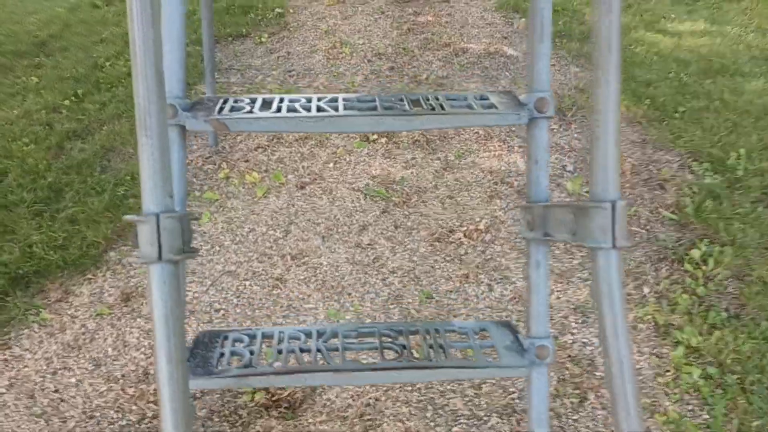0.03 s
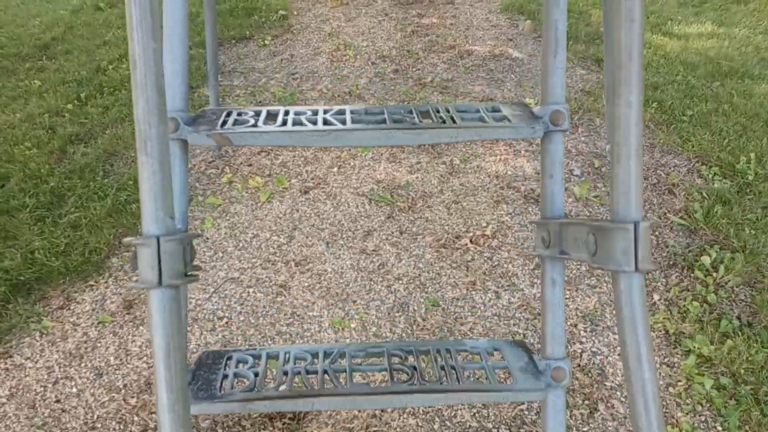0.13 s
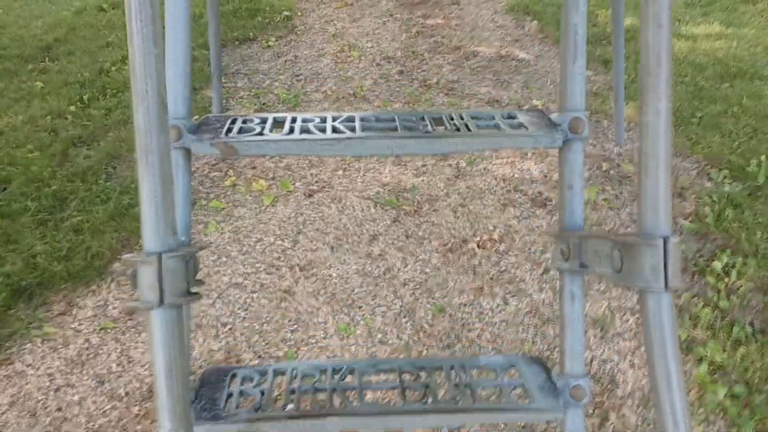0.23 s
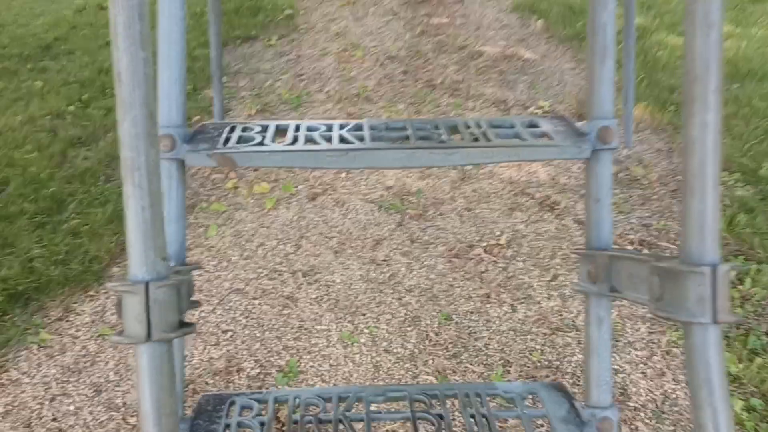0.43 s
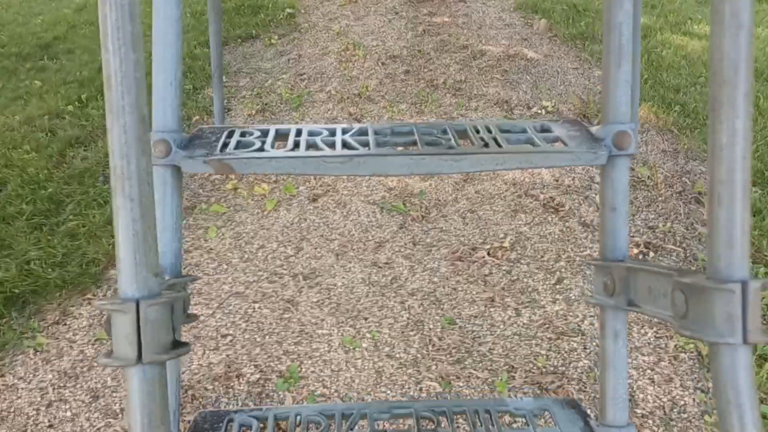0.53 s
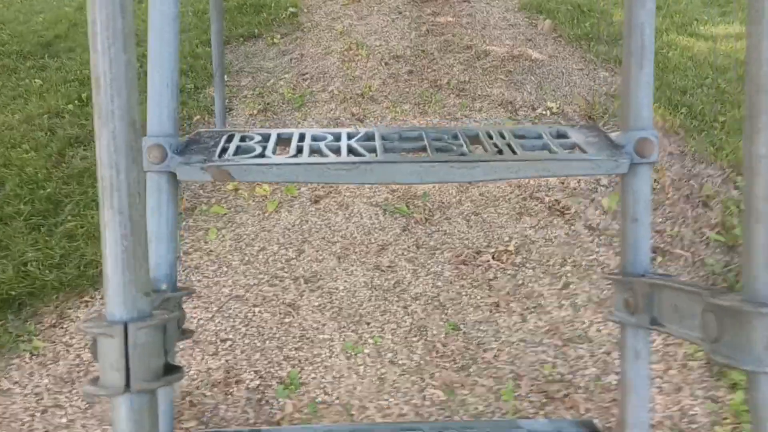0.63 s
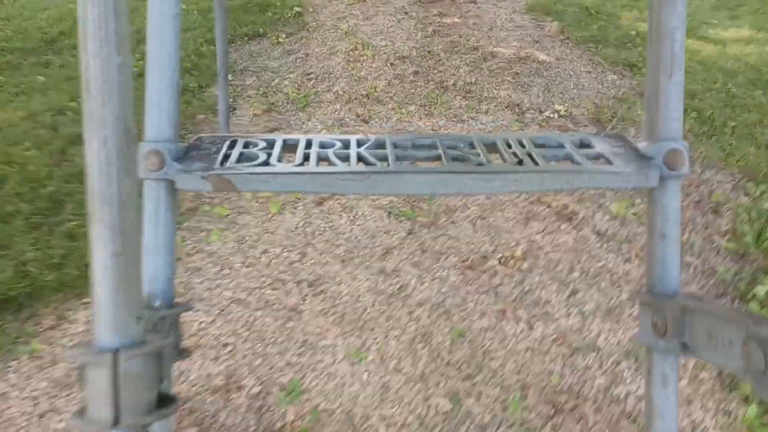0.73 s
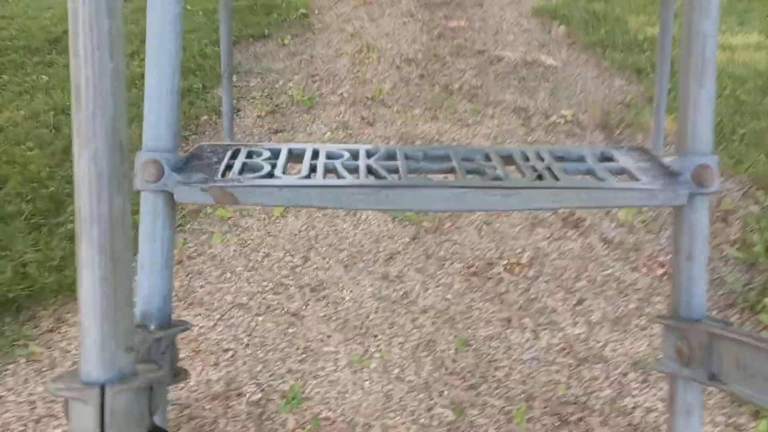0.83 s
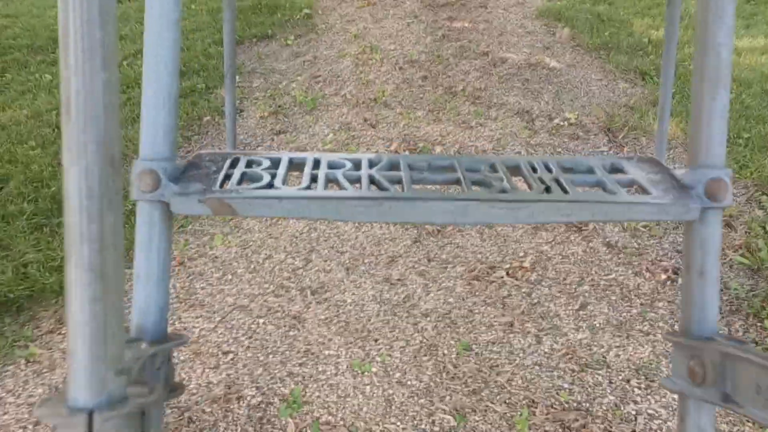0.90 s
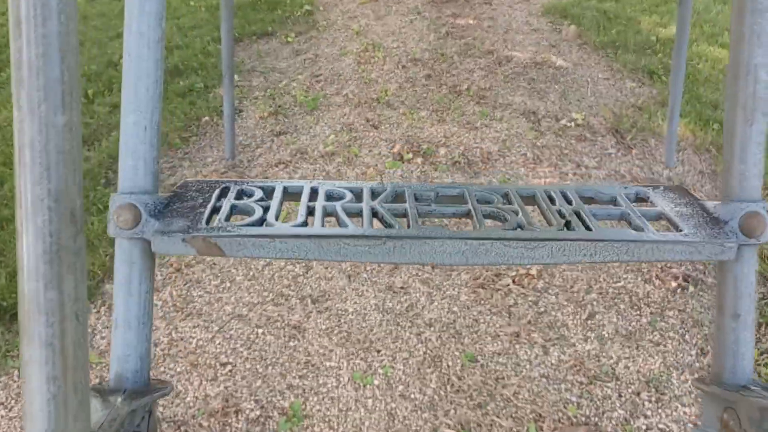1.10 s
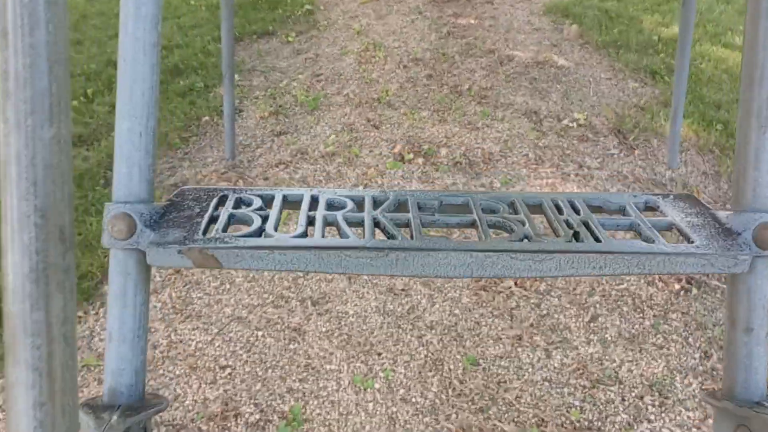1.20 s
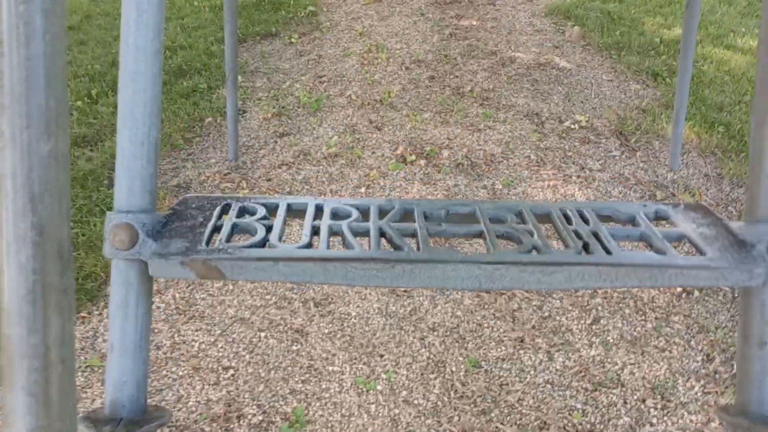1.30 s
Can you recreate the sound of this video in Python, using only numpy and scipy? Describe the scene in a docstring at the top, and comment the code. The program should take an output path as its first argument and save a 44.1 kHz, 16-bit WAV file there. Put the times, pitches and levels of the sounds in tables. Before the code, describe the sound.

Footsteps crunch through dry wood chips and end in a dull metallic knock on a ladder

```python
"""Footsteps in wood chips and a ladder knock

Two footsteps crunch into playground wood chips: showers of damped grains, ringing cracks and hissing grit.
A shoe then knocks a steel ladder: rung modes ring, and the frame shudders in low hollow jolts over a rumble.
Small birds chirp in the distance as gliding whistles with diffuse echoes; shaped noise makes a faint
traffic rumble and microphone hiss. A phone-sized stereo microphone listens.
"""
import sys
import numpy as np
from scipy import signal
from scipy.fft import rfft, irfft, next_fast_len
from scipy.io import wavfile
from scipy.ndimage import uniform_filter1d

SR = 44100
rng = np.random.default_rng(int(sys.argv[2]) if len(sys.argv) > 2 else 0)


def gain_from_db(level_db):
    """Convert decibel levels to linear amplitude factors (20 dB per decade)."""
    decades = np.asarray(level_db, float) / 20
    return 10 ** decades


def master(y):
    """Save y as 16-bit WAV."""
    cut = np.clip(np.atleast_2d(y).T, -1, 1)
    pcm = np.round(cut * 32767)  # scale
    wavfile.write(sys.argv[1], SR, pcm.astype(np.int16))


N = 59535  # samples, 1.35 s


def unit(x):
    """Normalization: scales a signal to an rms of 1."""
    return x / np.sqrt(np.mean(x ** 2) + 1e-20)


def along(points, hz):
    """Logarithmic pitch scale: interpolates (f/Hz, value) points along log frequency."""
    f, v = np.transpose(points)
    return np.interp(np.log(hz + 1), np.log(f + 1), v)


def level(rows):
    """Amplitude envelope: a gain per sample, linear in dB between (t/s, level/dB) rows."""
    s, db = np.transpose(rows)
    return gain_from_db(np.interp(np.arange(N) / SR, s, db))


def filtered(x, response):
    """Linear filtering: multiplies the spectrum by a response of frequency."""
    m = next_fast_len(N + 8192)
    hz = np.fft.rfftfreq(m, 1 / SR)
    return irfft(rfft(x, m) * response(hz), m)[..., :N]


def spread(pair, spectrum, alike):
    """Interchannel correlation: mid and side weights set the left-right likeness of a coloured pair of rms 1."""
    def weights(hz):
        turn = np.arccos(np.clip(along(alike, hz), -1, 1)) / 2
        return gain_from_db(along(spectrum, hz)) * [np.cos(turn), np.sin(turn)]

    mid, side = filtered(pair, weights)
    return unit(np.array([mid + side, mid - side]))


def add(track, s, sound):
    """Superposition: adds a sound to the track from time s."""
    part = track[..., max(round(s * SR), 0):][..., :sound.shape[-1]]
    part += sound[..., :part.shape[-1]]


def air():
    """Stationary noise: Gaussian noise is coloured as far traffic rumble and microphone hiss."""
    # ambient spectrum: f/Hz, relative density/dB per Hz
    ambient_spectrum = [(30, -28), (70, -15), (130, -6), (200, -13.5), (450, -23), (1000, -45), (2700, -36),
                        (5500, -51.5), (12500, -51.5), (15600, -47)]
    # left-right correlation of the ambience: f/Hz, likeness (0 to 1)
    ambient_alike = [(60, 0.43), (150, 0.81), (600, 0.077), (3000, 0.019)]
    rms_db = -68.5
    return gain_from_db(rms_db) * spread(rng.standard_normal((2, N)), ambient_spectrum, ambient_alike)


def birds():
    """Frequency modulation and reverberation: gliding, fluttering whistles blurred by echoes from far trees."""
    # bird notes before flutter and pan: t/s, length/s, start f/Hz, end f/Hz, level/dB
    notes = [(0.084, 0.048, 4580, 3660, -79.5), (0.397, 0.032, 5350, 4230, -69.5),
             (0.42, 0.036, 2900, 4110, -65), (0.447, 0.028, 3825, 2800, -70),
             (0.867, 0.042, 4150, 3340, -75), (0.975, 0.041, 4000, 3400, -75.5),
             (1.001, 0.034, 4360, 3000, -75), (1.022, 0.042, 4920, 3070, -70),
             (1.037, 0.033, 4600, 2790, -71.5), (1.098, .03, 3500, 4820, -79.5),
             (1.13, 0.045, 4580, 3300, -76.5), (1.16, 0.034, 4515, 2850, -74.5),
             (1.266, 0.034, 4500, 2910, -82.5), (1.304, 0.034, 4090, 2810, -82.5)]
    pan_db, flutter_db = -2.5, 2.5  # each side's gain leans right; rms flutter
    echo_db, echo_t60 = 1.5, 0.3  # dB, s
    dry = np.zeros(N)
    for s, length, from_hz, to_hz, db in notes:
        u = np.arange(round(length * SR)) / (length * SR)
        phase = 2 * np.pi * np.cumsum(from_hz + (to_hz - from_hz) * u) / SR
        fade = np.minimum(5 * np.minimum(u, 1 - u), 1)
        add(dry, s, gain_from_db(db) * fade * np.sin(phase))
    # noise smoothed over 5 ms makes the level flutter
    flutter = signal.fftconvolve(rng.standard_normal(N), np.hanning(SR // 200), "same")
    dry = dry * gain_from_db(flutter_db * unit(flutter))
    t = np.arange(SR // 2) / SR
    tail = rng.standard_normal((2, len(t))) * gain_from_db(-60 * t / echo_t60) * (1 - np.exp(-t / 0.0022))
    echo = signal.fftconvolve(dry[None], tail / np.linalg.norm(tail[0]), axes=1)[:, :N]
    return dry * gain_from_db([[pan_db], [-pan_db]]) + gain_from_db(echo_db) * echo


def shudder():
    """Resonance: the frame hums in short jolts while noise excites its modes as a loose low rumble."""
    # frame jolts: t/s, length/s, f/Hz, level of the hum at its start/dB
    jolts = [(0.688, 0.036, 233.4, -40), (.726, 0.014, 230.5, -37.5), (0.75, 0.026, 207, -39.5),
             (.798, 0.014, 198, -44.5), (0.82, 0.0265, 228.8, -42), (0.856, 0.039, 238.5, -44),
             (0.906, 0.044, 231.6, -49), (0.944, 0.033, 202.6, -54), (0.999, 0.038, 218.6, -59.5)]
    # level of the rumble: t/s, level/dB
    shake = [(.677, -100), (.69, -47.5), (.78, -57), (1.05, -72.5), (1.3, -91.5)]
    # frame resonances: f/Hz, width/Hz, relative level/dB
    frame_modes = [(128.6, 27.6, 8), (230.2, 11.4, 12), (346.8, 13, 3), (494, 25, -6.5)]
    rise_s, fall_s, sag_db = 0.00063, 0.003, 1  # the sag is per jolt length
    hum = np.zeros(N)
    for s, length, hz, db in jolts:
        t = np.arange(round((length + 5 * fall_s) * SR)) / SR
        envelope = (1 - np.exp(-t / rise_s)) * np.exp(-np.maximum(t - length, 0) / fall_s)
        tone = np.sin(2 * np.pi * hz * t) + 0.14 * np.sin(2 * np.pi * 1.6 * hz * t)
        add(hum, s, gain_from_db(db - sag_db * t / length) * envelope * tone)

    def response(f):
        modes = sum(gain_from_db(db) * 1j * f * w / (c * c - f * f + 1j * f * w) for c, w, db in frame_modes)
        return modes * (f > 60)

    mid, side = (unit(filtered(rng.standard_normal(N), response)) * level(shake) for _ in "ms")
    return hum + mid + gain_from_db(-4) * side * [[1], [-1]]


def lean(x):
    """Interaural differences: sound reaches the right port first, its middle tones more strongly there."""
    # balance of the ports: f/Hz, left minus right level/dB
    balance = [(400, 1.5), (2500, -8.5), (5000, 3)]
    left_lag_s = 0.00007
    way = np.array([[1], [-1]])

    def response(hz):
        gain = gain_from_db(along(balance, hz) / 2 * way)
        return gain * np.exp(-1j * np.pi * hz * left_lag_s * way)

    return filtered(x, response)


def knock():
    """Modal impact: the shoe rings the rung briefly and cracks against it."""
    # shoe on the rung: t/s, ring level/dB, crack noise level before smoothing/dB
    knocks = [(0.6786, -33, -36.5), (0.7451, -43.5, -36)]
    # rung modes: f/Hz, relative level/dB, t60/s
    rung_modes = [(301, 5, 0.034), (831, -3, 0.043), (1270, -6, 0.023), (2580, -12, 0.065),
                  (5180, -16, 0.042), (6500, -13, 0.06)]
    out, t = np.zeros((2, N)), np.arange(SR // 8) / SR
    for s, db, crack_db in knocks:
        ring = sum(gain_from_db(g - 60 * t / t60) * np.sin(2 * np.pi * hz * t) for hz, g, t60 in rung_modes)
        onset = 1 - np.exp(-t / 0.0011)
        # two running means dull the noise
        dull = uniform_filter1d(uniform_filter1d(rng.standard_normal(len(t)), size=4), size=3)
        crack = gain_from_db(crack_db - 60 * t / 0.017) * dull
        add(out, s, gain_from_db(db) * ring * onset + crack)
    return lean(out)


def cracks():
    """Brittle fracture: each chip rings a couple of cycles, with a shorter upper mode, and spits a tick."""
    # single chips cracking: t/s, ring level/dB, f/Hz
    breaks = [(.002, -52, 597), (0.117, -47.5, 1950), (.162, -52, 1750), (.248, -34.5, 610),
              (0.2602, -36.5, 626), (.265, -37.5, 594), (.281, -41, 1100), (.292, -37, 605),
              (.298, -37.5, 583), (.316, -35.5, 750), (0.3277, -32.5, 1100), (.329, -34, 720),
              (0.3352, -31, 1510), (0.53, -52.5, 795), (.549, -41, 680), (.5905, -38.5, 724),
              (0.5938, -38.5, 990), (.606, -33.5, 1060), (0.617, -34.5, 1580), (0.639, -32.5, 2080),
              (0.647, -37.5, 1800), (0.656, -32, 1920), (.932, -57.5, 1300), (0.949, -60.5, 680)]
    cycles, tick_db = 1.87, -24  # the tick is relative to the ring
    out, t = np.zeros((2, N)), np.arange(600) / SR
    for s, db, hz in breaks:
        u = 3 * t * hz / cycles
        upper = 0.33 * np.exp(-u / 2) * np.sin(2 * np.pi * 2.38 * hz * t)
        ring = u * np.exp(1 - u) * (np.sin(2 * np.pi * hz * t) + upper)
        tick = gain_from_db(tick_db - 60 * t / 0.018) * rng.standard_normal((2, len(t)))
        add(out, s, gain_from_db(db) * (ring + tick))
    return lean(out)


def grains(count, hz, cycles, size_db):
    """Shot noise: random short damped pulses, whitened so that a spectrum can colour them."""
    draw, t = rng.random((count, 3)), np.arange(400) / SR
    # pitches scatter log-normally about hz
    f = np.clip(hz * np.exp(0.64 * rng.standard_normal(count)), 150, 15000)[:, None]
    size = gain_from_db(size_db * 2 * draw[:, 1:2] ** 2)
    sign = np.sign(draw[:, 2:] - .5)
    wave = size * np.sin(2 * np.pi * f * t) * np.exp(-t * f / cycles) * sign
    place = (draw[:, :1] * N).astype(int) + np.arange(400)
    x = np.bincount(place.ravel(), wave.ravel(), N + 400)[:N]
    f, p = signal.welch(x, SR, nperseg=256)
    return filtered(x, lambda hz: 1 / np.sqrt(np.interp(hz, f, p)))


def crunch():
    """Granular friction: chips grind under the sole as a shower of grains; grit hisses and snaps on top."""
    # weight pressing the chips: t/s, crunch level before the lean/dB
    weight = [(0, -70.5), (.05, -81.5), (.19, -70.5), (.24, -68), (.252, -58), (.296, -50), (.35, -46.5),
              (.375, -55.5), (.41, -70), (.51, -78), (.535, -57.5), (.61, -46.5), (.66, -47), (.671, -58),
              (.76, -57), (.845, -84), (.915, -95), (.94, -68), (.98, -81.5)]
    # sandy treble of the steps before the pan: t/s, level/dB
    sand = [(0, -79), (.24, -78), (.25, -64.5), (.3, -60.5), (.36, -60), (.385, -69), (.45, -80),
            (.53, -78.5), (.58, -67), (.665, -61), (.74, -91), (.87, -108), (.895, -80.5), (.96, -77.5),
            (1.05, -82)]
    # bright snaps of dry splinters before the pan: t/s, starting level/dB
    splinters = [(0.3179, -53), (0.356, -59), (.579, -60), (0.6172, -53.5)]
    # colour of the chips: f/Hz, relative density/dB per Hz
    chip_spectrum = [(60, -49), (200, -8.5), (350, -5), (750, -3), (1900, -6.5), (2600, -10), (3400, -19.5),
                     (5000, -38.5)]
    # colour of the grit: f/Hz, relative density/dB per Hz
    grit_spectrum = [(2000, -13), (3500, -1.5), (5500, -3.5), (8500, -12.5), (10500, -11.5), (12500, -6),
                     (15600, -11)]
    # left-right correlation of the chips before the lean: f/Hz, likeness (0 to 1)
    chip_alike = [(400, 0.88), (2500, 0.59), (5000, 0.42)]
    snap_t60 = 0.016  # s
    coarse = [grains(count=1500, hz=1100, cycles=0.65, size_db=2) for _ in "ms"]
    body = lean(spread(np.array(coarse), chip_spectrum, chip_alike)) * level(weight)
    fine = [grains(count=9000, hz=7880, cycles=0.8, size_db=1.5) for _ in "ms"]
    grit = spread(np.array(fine), grit_spectrum, [(5000, 0.098)])
    since = np.arange(N) / SR - np.array(splinters)[:, :1]
    decay = gain_from_db(np.array(splinters)[:, 1:] - 60 * np.abs(since) / snap_t60)
    snaps = (decay * (since > 0)).sum(axis=0)
    return body + grit * (level(sand) + snaps) * gain_from_db([[1.3], [-1.3]])


def scene():
    """Superposition: the sum of all sources."""
    return air() + birds() + shudder() + knock() + cracks() + crunch()


def low_pass(x):
    """Removes everything above the highest recorded frequency."""
    return signal.sosfilt(signal.butter(12, 15710, fs=SR, output="sos"), x)


def record(dry):
    """High-pass response: the microphone loses the deepest bass, below about 60 Hz."""
    mix = filtered(dry, lambda hz: 1 / np.sqrt(1 + (60 / (hz + 1)) ** 6))
    return low_pass(mix)


dry = scene()
out = record(dry)
master(out)
```